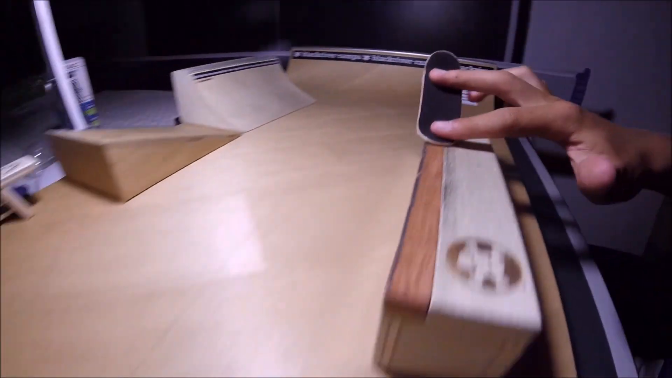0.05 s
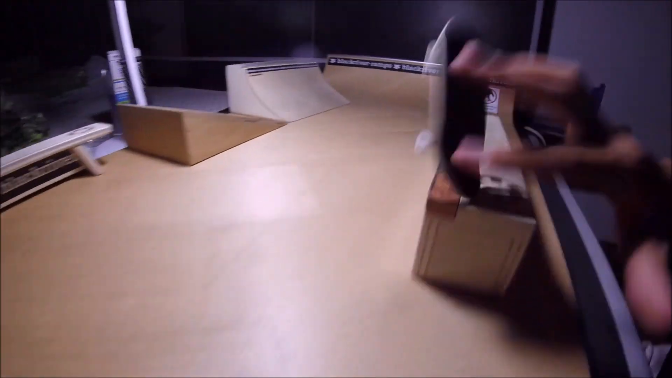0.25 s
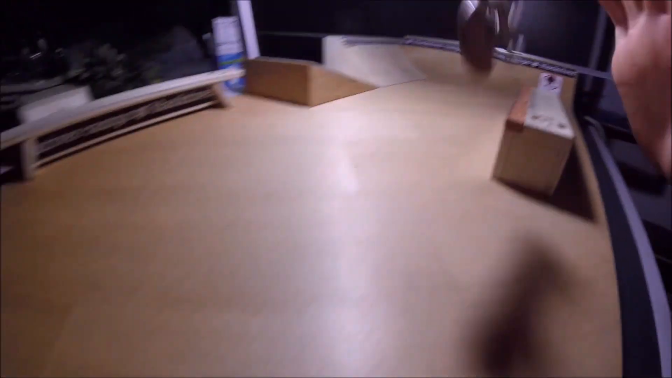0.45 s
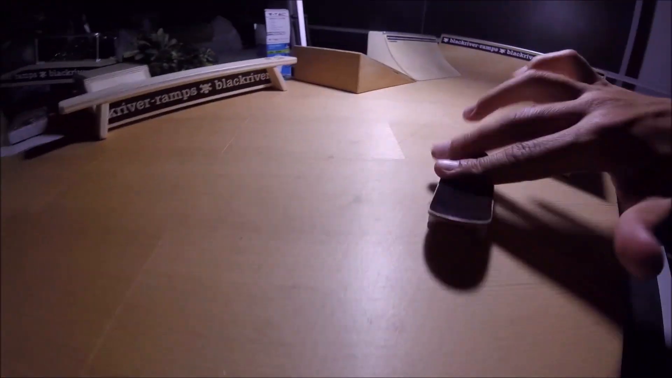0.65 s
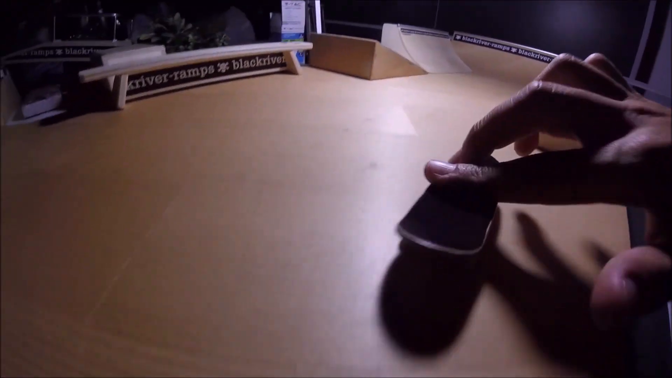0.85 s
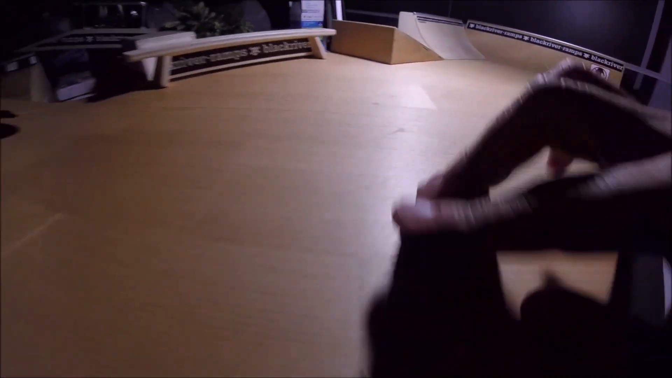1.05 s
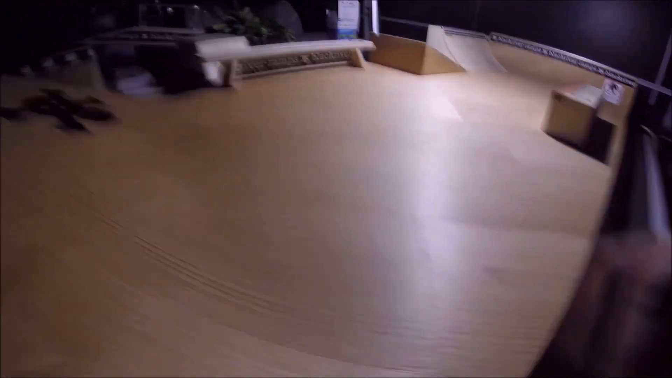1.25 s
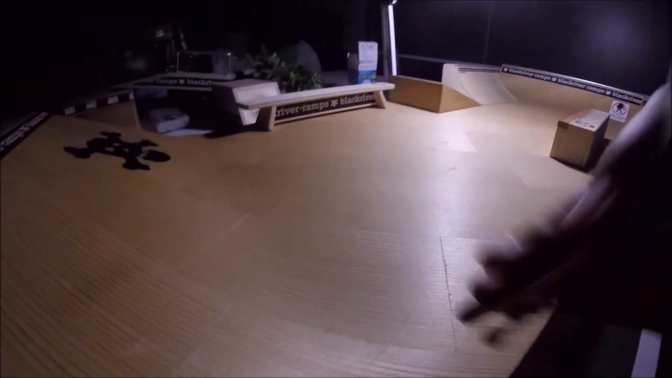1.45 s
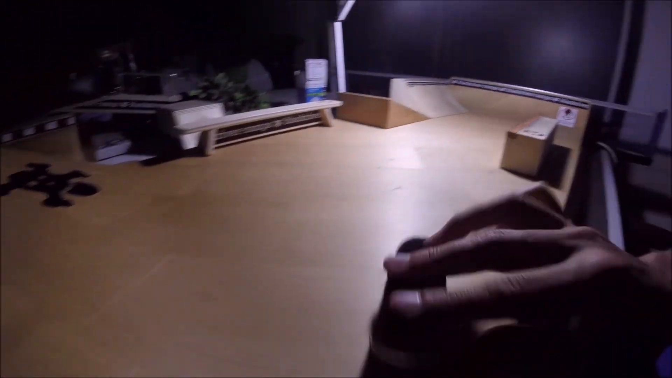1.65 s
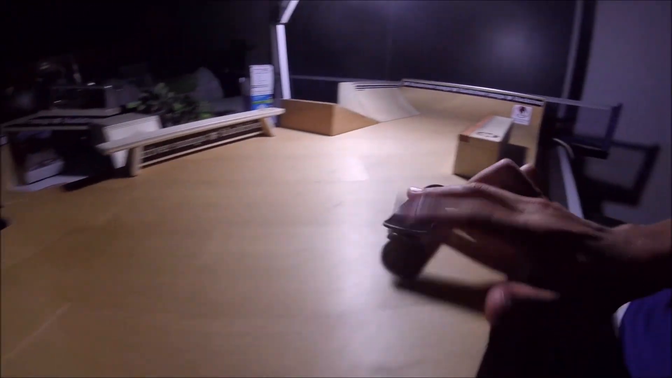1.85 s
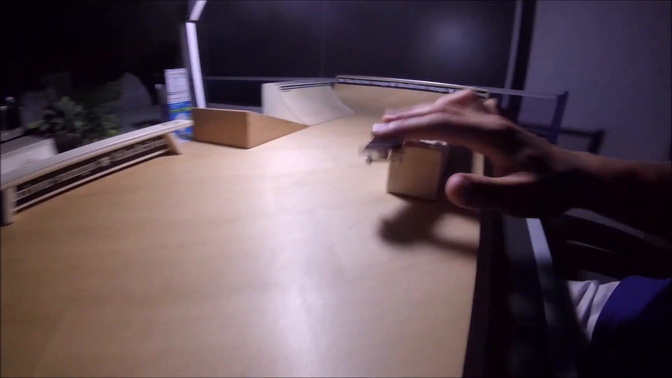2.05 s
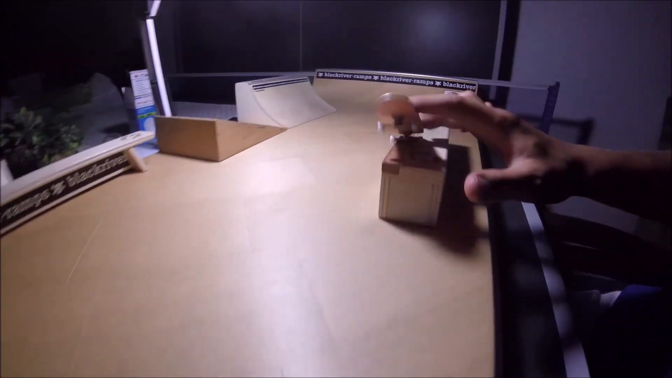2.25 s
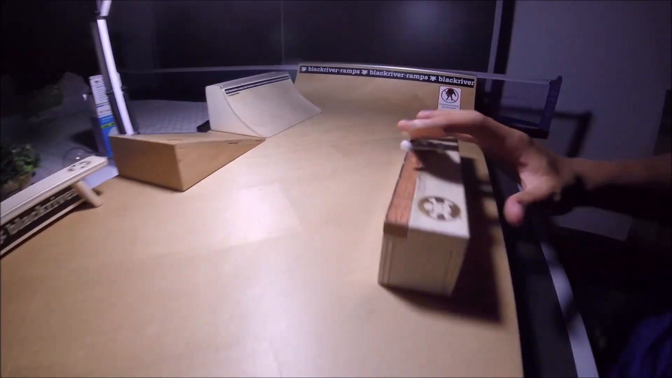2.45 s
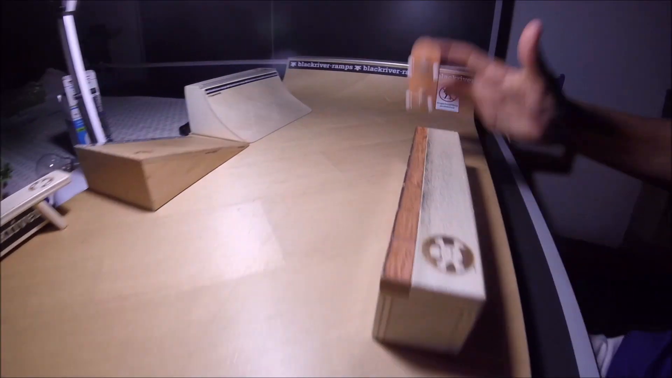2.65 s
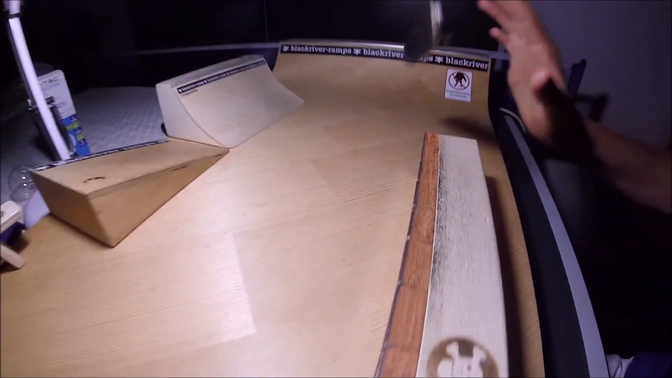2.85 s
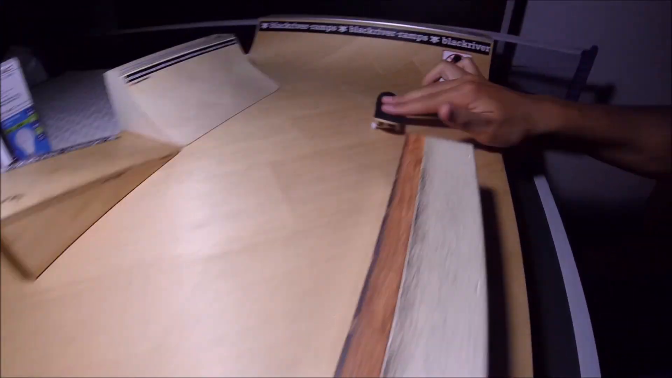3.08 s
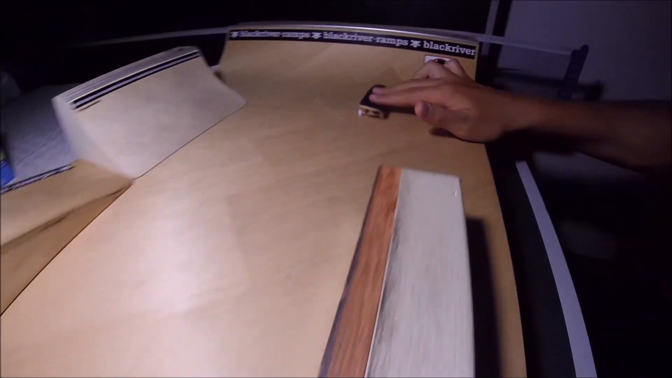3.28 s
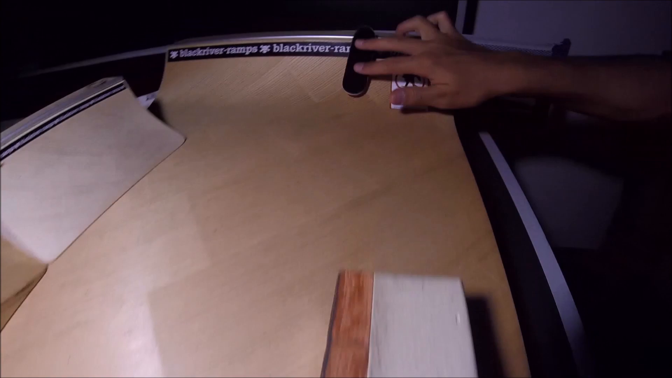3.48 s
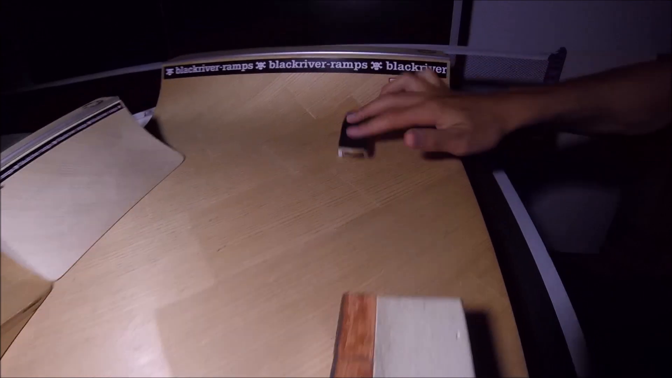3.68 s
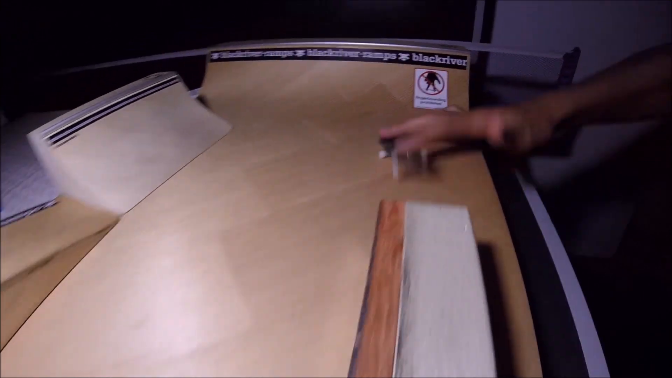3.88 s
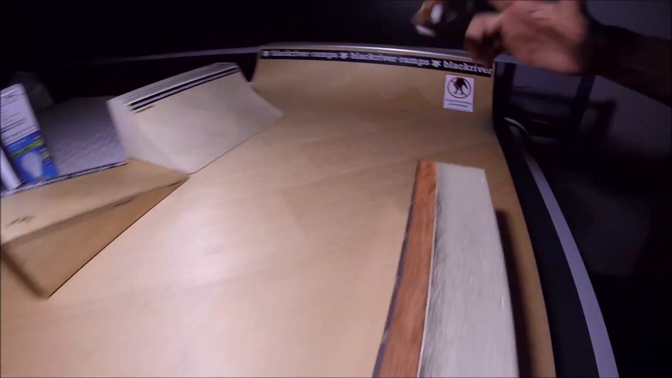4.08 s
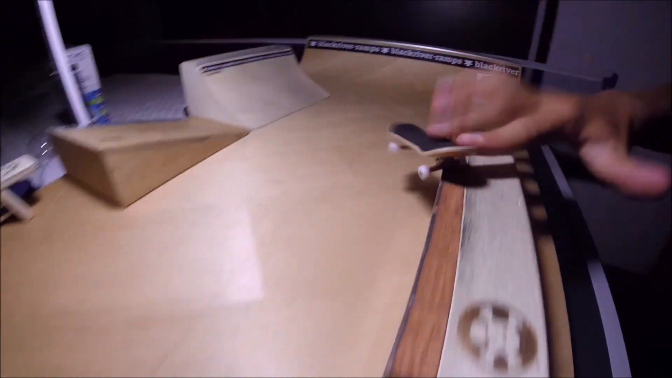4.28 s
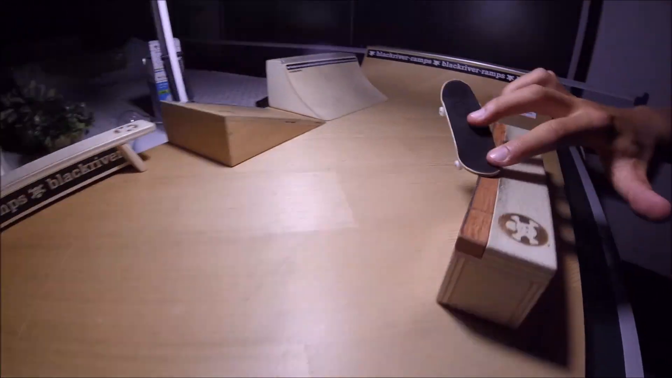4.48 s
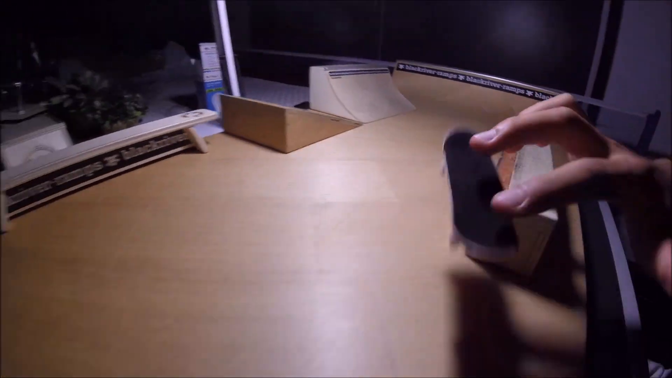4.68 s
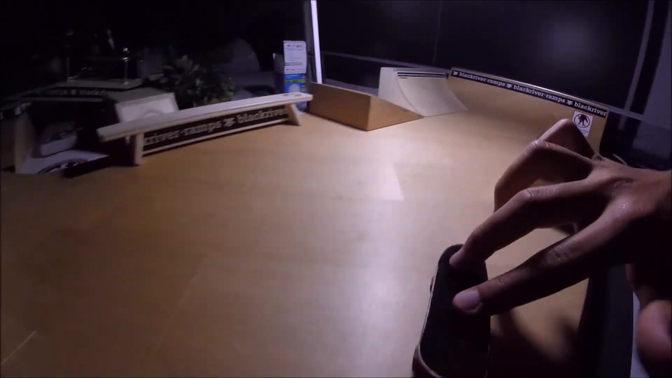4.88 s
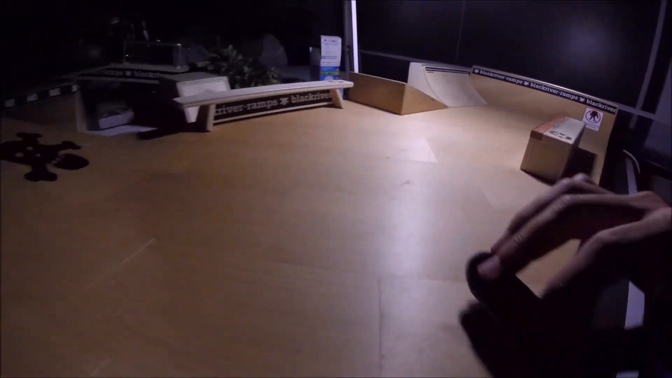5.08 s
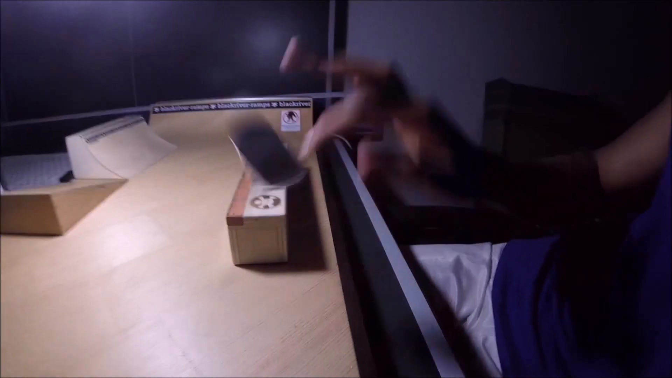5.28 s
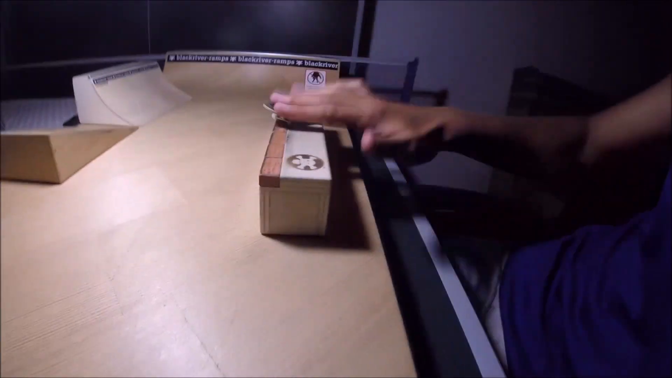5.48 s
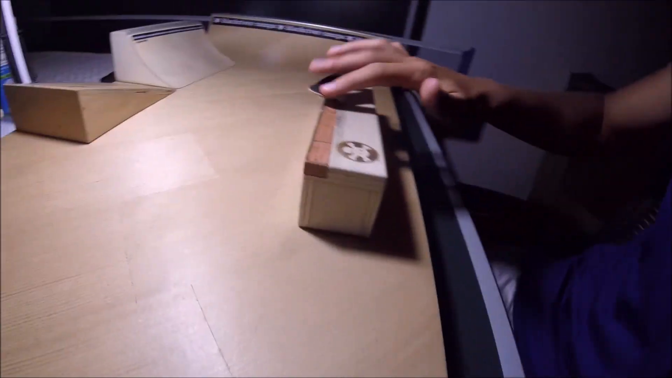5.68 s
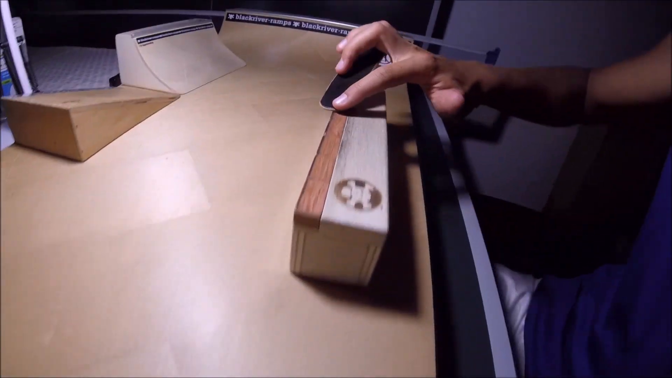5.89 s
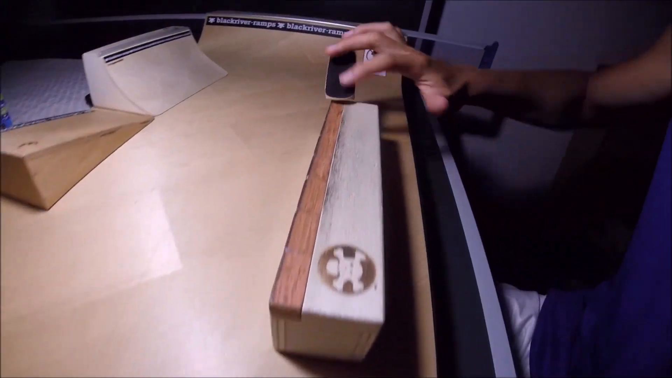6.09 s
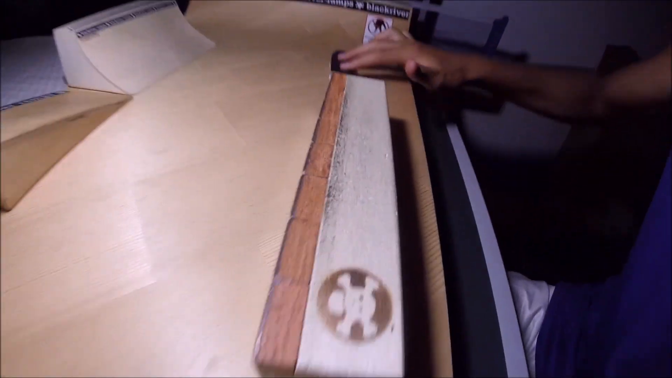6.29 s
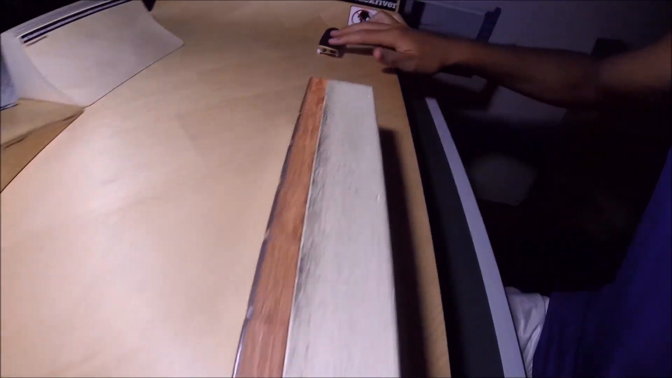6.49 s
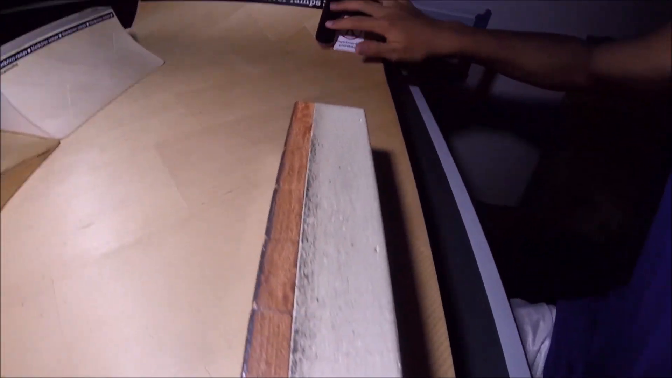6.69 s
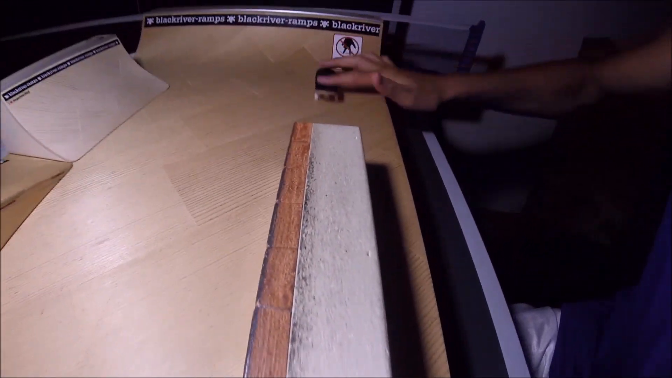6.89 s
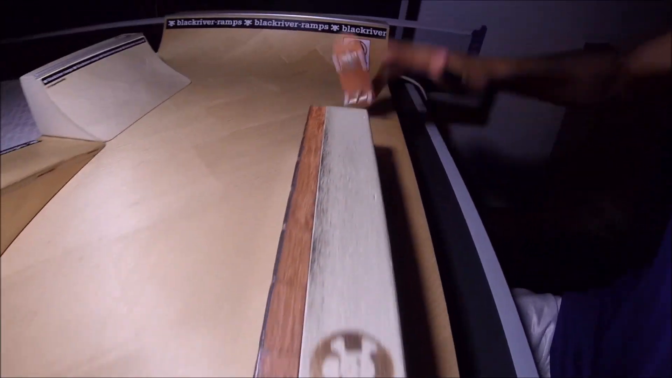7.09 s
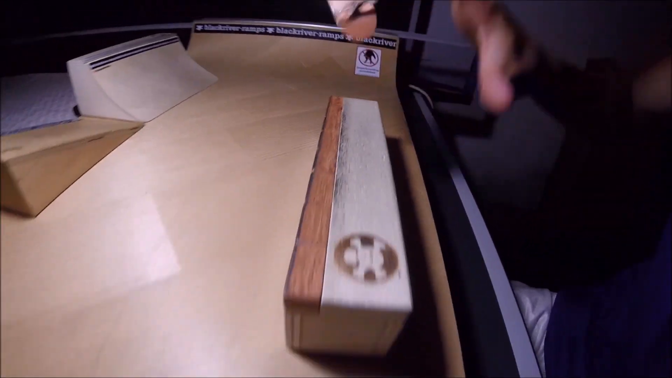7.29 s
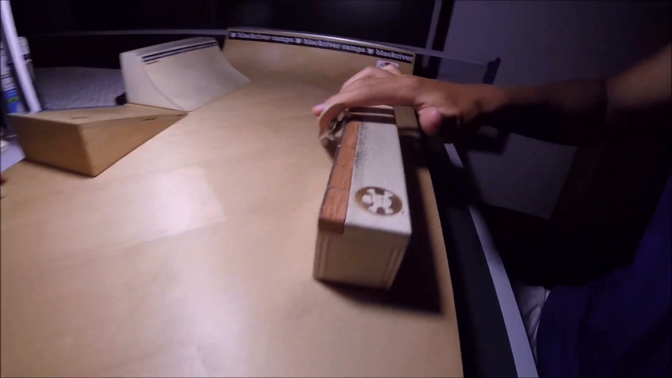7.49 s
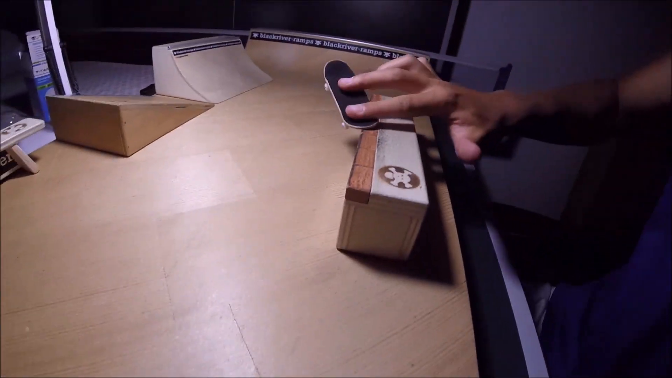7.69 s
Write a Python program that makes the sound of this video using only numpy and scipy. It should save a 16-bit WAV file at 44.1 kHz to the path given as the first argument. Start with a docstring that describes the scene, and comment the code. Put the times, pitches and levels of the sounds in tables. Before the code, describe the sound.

Very close, boxy pickup of a miniature skateboard on a wooden tabletop with ramps. Quick double and triple clacks mark pops and landings, with rattling truck chatter on the ledge and short fading wheel rubs between. A sharp plasticky knock hits the microphone's case early on, then more tricks follow, with quieter rolling gaps. Slight room reverberation, soft hiss and dull rumble stay underneath.

```python
"""A toy skateboard is rolled, popped, ground along a wooden ledge and landed on a desk, close to a small camera.
Strikes are bursts of noise and wheel rub is grainy noise, both through the cavities of the camera's case;
spinning bearings hiss in a narrow band, flat landings thump the desk top and the strikes echo in the room.
Knocks on the case ring its walls and mount as dying sines. Hiss and a slow rumble lie beneath.
The input saturates on peaks, and a gain control ducks what is loud and creeps back."""
import sys
import numpy as np
from scipy import signal
from scipy.fft import rfft, irfft
from scipy.io import wavfile
from scipy.ndimage import uniform_filter1d

SR = 44100
rng = np.random.default_rng(int(sys.argv[2]) if len(sys.argv) > 2 else 0)


def wrap_up_sound(samples):
    """Save the sound to the file named by the first command line argument, as 16-bit audio."""
    columns = np.atleast_2d(samples).T
    # keep every value between -1 and 1, then stretch to whole-number steps
    tamed = np.clip(columns, -1, 1)
    steps = np.round(tamed * 32767).astype(np.int16)
    wavfile.write(sys.argv[1], SR, steps)


N = 341334  # length in samples

# room tone and input noise, shape only: f/Hz, level/dB per Hz
HISS_COLOUR = [(24, -32.5), (40, -1.5), (345, -9), (516, -11), (1070, -16.5), (1850, -19), (3220, -24),
               (13800, -42.5), (16000, -65.5)]
HISS_DB = -56  # rms
# rumble of the jogged camera, shape only: f/Hz, level/dB
SWAY_COLOUR = [(6, -32.5), (18, -2.5), (35, -9.5), (70, -31.0), (200, -73.0)]
# the hand-held camera is jogged: t/s, level/dB
SWAYS = [(.0, -52), (.35, -44), (.75, -59), (1.0, -53), (1.418, -40), (2.4, -58), (3.1, -49), (4.85, -52),
         (5.37, -61.5), (6.27, -67.5), (6.95, -60)]
SWAY_S, SWAY_FLOOR_DB = 0.055, -59  # time from the peak of a swell to 1/e; steady rumble

# cavities of the case: f/Hz, width/Hz, level/dB
CASE_CAVITIES = [(989, 50, -4.5), (1320, 710, -4), (1501, 204, 6.5), (1865, 40, -3.5), (2375, 490, -1),
                 (2830, 36, -6), (3328, 530, -6.5), (3856, 310, -15.5), (5090, 600, -20.5),
                 (6244, 780, -12.5), (7580, 770, -20.5), (8720, 1000, -22.5)]
# what passes between the cavities: f/Hz, level/dB
CASE_PORT = [(500, -19), (800, -18.5), (1500, -18), (3500, -18), (4500, -24.5), (9000, -30), (12000, -41),
             (16000, -53.5)]
# modes of the desk top: f/Hz, width/Hz, level/dB
DESK_MODES = [(343, 87, -5), (465, 95, -8), (674, 120, 3)]
REGION_EDGES_HZ = (1300, 1950, 2900, 4500)  # between thud, deck, clack, snap and tick

# wheels and trucks in contact: full from t/s, rise/s, hold/s, snap level/dB, fade/dB per s,
# then against the snap: deck level/dB, clack level/dB
ROLL_RUNS = [(.0, .006, 0.0075, -45.5, 88, -4, -14), (0.286, 0.1, .015, -38.5, 352, 2, -2.5),
             (0.354, .02, .01, -53.5, 38.5, 2.5, -4), (0.625, 0.0055, 0.047, -45.5, 21.5, -5, -12),
             (1.09, 0.16, 0.094, -51, 65.5, -10, -9), (1.846, 0.19, .02, -45.5, 151, -16, 0.5),
             (1.968, 0.029, 0.11, -58, 151, -7, -9), (2.142, 0.0067, .02, -47.5, 46, -18, -6.5),
             (2.588, 0.064, 0.03, -37.5, 350.5, -9, -11), (2.67, .03, 0.033, -52, 45, -6.5, -18),
             (2.996, 0.0068, 0.062, -38, 38.5, -2, -10.5), (3.426, 0.18, 0.046, -60, 85, 6.5, 10.5),
             (3.631, 0.018, 0.063, -58, 60, 8.5, 9.5), (3.747, .03, .02, -59.5, 62, 3, 7),
             (3.843, 0.071, 0.022, -56.5, 150, -15, 7), (3.97, .006, .02, -62, 77, -3, -3),
             (4.3, .006, 0.012, -43, 198, 6.5, -5), (4.333, .02, .01, -52, 35, 4, -5),
             (4.639, 0.087, 0.014, -44.5, 127, -0.5, -5), (4.8, .006, .02, -45.5, 33, -11, -5.5),
             (5.16, 0.17, 0.017, -50, 250, -6, -0.5), (5.212, .02, 0.1, -65.5, 65, -5.5, -8),
             (5.523, 0.046, 0.011, -46, 79, 3, -5), (5.824, 0.19, 0.036, -57.5, 65, -8, -4),
             (6.06, 0.12, 0.017, -57, 130, 3, 4), (6.191, .006, 0.027, -43.5, 27.5, -2.5, -1),
             (6.787, 0.1, .03, -58, 70, -8, 11), (6.981, 0.095, .02, -52, 94.5, -1, 1),
             (7.11, .01, .01, -57, 63, -8, -7), (7.411, 0.0047, 0.0089, -49, 139.5, 2.5, -2),
             (7.588, 0.1, 0.016, -54.5, 115, -1.5, -8)]
RISE_DB = 20.5  # climb of a run over its rise time
ROLL_THUD_DB, ROLL_THUD_PER_CLACK, ROLL_TICK_DB = -2.5, 0.78, -12.5  # against the snap
# the wheels dig into the curve of a ramp: t/s, half length/s, gain level/dB
RAMP_PRESSES = [(3.64, .012, 0), (3.679, 0.017, 5.5), (3.747, 0.026, 2), (3.862, 0.034, 4),
                (6.758, .02, 3.5), (6.818, 0.0073, 1), (5.086, 0.031, 6.5)]
# the rolling falls silent for a while: start t/s, end t/s
ROLL_SILENT = 1.305, 1.69

# board strikes: t/s, snap energy level/dB, then against the snap: deck level/dB, clack level/dB,
# tick level/dB, desk boom level/dB; last contact length/ms
BOARD_STRIKES = [(0.0149, -18.5, -14, 0, -1, -7.5, 1.8), (0.198, -25, -20, -5, -17, -16, 1.8),
                 (0.208, -12, -33, -24, -10, -11, 2.2), (0.2238, -17, -15, -1, -19, -26, 1.6),
                 (0.2351, -8, -12, -7, -15, -17, 1.2), (0.238, -12.5, 10, -5, 1, -15, 0.55),
                 (0.28, -21, 8, 6, -6, -21, 1.5), (0.291, -15, -11, 8, -1, -25, 2.7),
                 (0.309, -14, -8, 9, 4, -28, 2.4), (0.3275, -18.5, -11, 4, 0.5, -15, 2.2),
                 (0.6261, -12, 6, -4, 1.5, -12, 2.3), (0.633, 0, -2.5, -5.5, -6.5, -28, 2.2),
                 (0.645, -4, -31, -12, -8, -22, 2.8), (0.652, 1.5, 1, -22, -5.5, -17, 2.3),
                 (0.6638, -13.5, 10, -12, -15, -13, 0.88), (1.083, -27, -3.5, 10, -7, -4, 3.8),
                 (1.097, -27.5, 4, 16, -2, -13, 3.9), (1.3033, -45, 4, 5, 19, -2, .8),
                 (1.638, -23, -24, -12, -5, -12.5, 1.1), (1.6675, -24, -16, -6.5, -2.5, -18.5, 2.3),
                 (1.6915, -13, -13, -3, -2, -13, 2.6), (1.9722, -19.5, -4, 9.5, 0, -10, 2.9),
                 (1.9845, -24.5, -10.5, 3, -4, -21, 1.34), (2.1468, -10, -5, -1.5, 0, -19, 4.4),
                 (2.201, -15, -10, -13, -6.5, -23, 2.5), (2.406, -29.5, -3.5, 7, 1, -14, 2.3),
                 (2.5313, -21.5, -22, -5, -5, -11.5, 2.3), (2.578, -16, -23.5, -10, 1, -15, 3.4),
                 (2.6018, -13, -16, -0.5, -6, -25, 3), (2.6164, -8, -3, -13.5, -9.5, -39, 4.2),
                 (2.9942, -5.5, -5, -18, -5, -12, 2.8), (2.9979, 6.5, -2, -9, -3.5, -28, 1.4),
                 (3.0017, 0.5, 0, -16, -0.5, -23, 1.1), (3.0063, 0.5, -2, -9, -7, -35, 3.8),
                 (3.6295, -34.5, 14, 17, -5, 3, 1.4), (3.966, -18.5, 4, 10, 3.5, -13, 1.7),
                 (3.975, -31, -6, 10, -8, -17, 1.6), (4.2945, -8, 0, 13, -5, -8, 2.1),
                 (4.3031, -28, 1, -0.5, 8, -15, 1.6), (4.3102, 0, -4, -6, -4, -13.5, 2.3),
                 (4.3202, -16.5, -17, 5, -3, -7, 2.5), (4.474, -25, -3, -8, -0.5, -4, 1.2),
                 (4.6043, -17.5, -16, -3, -7.5, -10, 2.5), (4.642, -18, -12, 0, 1.5, -25, 1),
                 (4.792, -19.5, 13, -7, 2, -22, 3.1), (4.7984, 3.5, -6.5, -12, -3.5, -18, 2.9),
                 (4.81, -11, 3, -9, -20, -15, 1.6), (5.1892, -14, -26, -1, 1, -16, 1.4),
                 (5.452, -21.5, 4.5, 1, -13, 2, 3.4), (5.4918, -11.5, -7, 2, -5, -3, 4.4),
                 (5.5054, -16.5, 7, 6, -2, 1, 1.4), (5.52, 2, -6.5, -13, -0.5, -20, 1.63),
                 (5.869, -26.5, 1, 0, -6, -24, 7.5), (5.977, -28, 8.5, 11.5, -8, -9, 1.2),
                 (6.0045, -28, 6, 1, -11, -21, 1.5), (6.0154, -28, 5, -1, -13.5, -14, 1.5),
                 (6.035, -17, -2, -20, -14, -32, 2.2), (6.0482, -20, -1, 5, -15, -21, 3),
                 (6.064, -16.5, -6, 5, -5, -28, 2.3), (6.148, -36, 11, -3, 1, -8, 1.9),
                 (6.191, -6.5, -6, 4, -14, -18, 1.3), (6.1927, -5.5, 7.5, -23, -3, -26, 1.44),
                 (6.1981, 1.5, 2, -24, -10.5, -21, 1.1), (6.207, -10, 2, 0, -14, -22, 0.47),
                 (7.0937, -17, -5, 6, 7, -23, 2.9), (7.4111, -18, -2, 9, 4, -34, 2.5),
                 (7.4172, -11, 2, -5, 0, -23, 1.2), (7.4235, -19, -5, 5, -1, -14, 1.7),
                 (7.463, -29.5, 11.5, 2, -2, -8, 1.6), (7.5543, -28.5, 2, 7, -20, -8, 4.2)]
# the thud follows deck and boom
THUD_DB, THUD_PER_DECK, THUD_PER_BOOM = -1.5, .3, .4
# flat landings push the desk top into one low mode, set by the spot: t/s, f/Hz, level/dB
LANDING_THUMPS = [(.238, 695, -34), (2.996, 327, -27), (6.193, 303, -44)]
THUMP_T60_S, THUMP_RISE_S = 0.082, 0.009
# trucks chatter along the ledge: start t/s, end t/s, snap energy level/dB,
# then against the snap: deck level/dB, clack level/dB
LEDGE_GRINDS = [(0.252, .325, -20, -1.5, 4), (2.61, 2.64, -18.5, 1, -2), (4.649, 4.695, -20.5, -24, 3),
                (6.055, 6.109, -29.5, 7.5, 2)]
CHATTER_GAP_S, CHATTER_JITTER, CHATTER_SPREAD_DB = .011, .35, 3.5  # jitter in gaps
CHATTER_TICK_DB, CHATTER_BOOM_DB, CHATTER_MS = -4.5, -22, 1.8

# the wheel bearings hiss when they spin fast: start t/s, end t/s, level/dB
BEARING_SPINS = [(1.078, 1.314, -62), (1.76, 1.91, -57), (3.627, 3.88, -69), (5.06, 5.18, -58),
                 (6.933, 7.05, -65.5)]
SPIN_FADE_S = 0.02

# knocks on the case: t/s, force level/dB, contact length/ms, roughness (limited to 0-1)
CASE_KNOCKS = [(1.3124, 9, 0.11, 0.17), (1.319, -0.5, 1, 1.17), (1.324, -5.5, 4., 0.8),
               (1.336, -9, 3., 0.75), (1.34, -0.5, 5.6, 0.8), (1.347, 3.5, 1.7, 0.7)]
# quickly damped modes of the case walls: f/Hz, level/dB, t60/s
CASE_WALLS = [(1026, -16, 0.012), (1200, -17.5, 0.0091), (1885, -2.5, 0.011), (2295, -9.5, 0.018),
              (2583, -8, 0.017), (4090, -19.5, 0.021), (7300, -22, 0.0042)]
# modes of the mount, which the blows set ringing: f/Hz, level/dB, t60/s
MOUNT_MODES = [(626, -38, .22), (686, -44, .4), (868, -33, .16), (925, -36, .1), (1878, -33, .56)]

EDGE_HZ = 15500  # upper band limit of the output


def gain_of(db):
    """Decibels to a factor."""
    return 10 ** (np.asarray(db) / 20)


def evened(x):
    """Scales to rms 1."""
    return x / np.sqrt(np.mean(x ** 2) + 1e-20)


def read(points, hz):
    """Reads a spectrum on a log-frequency axis."""
    f, value = np.transpose(points)
    return np.interp(np.log(hz + 1), np.log(f + 1), value)


def add(mix, s, sound):
    """Mixes a sound in at a time."""
    part = mix[..., round(s * SR):][..., :sound.shape[-1]]
    part += sound[..., :part.shape[-1]]


def modes(table, hz):
    """Power of a set of resonances."""
    return sum(gain_of(db) ** 2 / (1 + (2 * (hz - f) / w) ** 2) ** 2 for f, w, db in table)


def ring(table):
    """Dying sines, one second long."""
    t = np.arange(SR) / SR
    return sum(gain_of(db - 60 * t / t60) * np.sin(2 * np.pi * hz * t) for hz, db, t60 in table)


def causal(gain):
    """Minimum-phase impulse response of energy 1 for a gain given from 0 Hz to SR / 2."""
    log_gain = np.log(np.maximum(gain / gain.max(), 1e-4))
    circle = np.concatenate([log_gain, log_gain[-2:0:-1]])
    taps = np.fft.ifft(np.exp(np.conj(signal.hilbert(circle)))).real[:2048]
    return taps / np.linalg.norm(taps)


def burst(ms, noise):
    """A contact force of energy 1: quick rise, exponential fall."""
    u = np.arange(noise.shape[-1]) / (SR * max(ms, .03) / 1000)
    force = (1 - np.exp(-3.5 * u)) * np.exp(-u) * noise
    return force / np.linalg.norm(force, axis=-1, keepdims=True)


def shaped_noise(points):
    """Noise of rms 1 with a given spectrum."""
    hz = np.fft.rfftfreq(N, 1 / SR)
    return evened(irfft(rfft(rng.standard_normal(N)) * gain_of(read(points, hz)), N))


def room_tone():
    """Steady hiss, and a slow rumble that swells when the camera is jogged."""
    t = np.arange(N) / SR
    swells = sum(gain_of(db) * np.exp(-((t - s) / SWAY_S) ** 2) for s, db in SWAYS)
    rumble = (gain_of(SWAY_FLOOR_DB) + swells) * shaped_noise(SWAY_COLOUR)
    return gain_of(HISS_DB) * shaped_noise(HISS_COLOUR) + rumble


def case_bands():
    """The colour of the case, cut into thud, deck, clack, snap and tick regions; last the boom of the desk."""
    hz = np.fft.rfftfreq(8192, 1 / SR)
    case_power = gain_of(read(CASE_PORT, hz)) ** 2 + modes(CASE_CAVITIES, hz)
    lowpasses = [1 / (1 + (hz / edge) ** 12) for edge in REGION_EDGES_HZ]
    # neighbouring low-passes differ by one region
    regions = abs(np.diff([0 * hz] + lowpasses + [1 + 0 * hz], axis=0))
    powers = [*(case_power * regions), modes(DESK_MODES, hz)]
    return [causal(np.sqrt(power)) for power in powers]


def wheel_rub(grains_per_s=1200, spread_db=1.0, smooth=1.9, flutter_db=1.0):
    """Wheels on the grain of the wood: dense uneven ticks on a steady rub, as six noises under one envelope."""
    grains = rng.random(N) < grains_per_s / SR
    ticks = gain_of(spread_db * np.minimum(rng.exponential(1, N), 4)) * grains
    # loose trucks make the contact flutter
    slow = uniform_filter1d(uniform_filter1d(rng.standard_normal(N), 300), 300)
    flutter = gain_of(flutter_db * evened(slow))
    return evened((smooth + evened(ticks)) * flutter * rng.standard_normal((6, N)))


def contact(t):
    """Level of the five regions: every run rises, holds and fades, and the runs add in power."""
    power = np.zeros((5, len(t)))
    for s, rise, hold, db, fade_db, deck_db, clack_db in ROLL_RUNS:
        rising_db = RISE_DB * np.maximum(s - t, 0) / max(rise, .002)
        fading_db = fade_db * np.maximum(t - s - hold, 0)
        thud_db = ROLL_THUD_DB + ROLL_THUD_PER_CLACK * clack_db
        region_db = np.array([[thud_db], [deck_db], [clack_db], [0], [ROLL_TICK_DB]])
        power += gain_of(region_db + db - rising_db - fading_db) ** 2
    return np.sqrt(power)


def wandering(x, patchy_db=2.0):
    """The colour drifts in patches as board and hand move."""
    z = signal.stft(x, nperseg=1024, noverlap=768)[2]
    patches = rng.standard_normal(z.T.shape)  # time by frequency
    patches = evened(uniform_filter1d(uniform_filter1d(patches, size=9, axis=0), size=4, axis=1))
    return signal.istft(z * gain_of(patchy_db * patches.T), nperseg=1024, noverlap=768)[1][:N]


def rolling(rub, bands):
    """The rub drives each region of the case colour, louder as wheels press, silent for a short stretch around
    the knocks."""
    t = np.arange(N) / SR
    coarse = t[::32]
    rolled = np.zeros(N)
    for level, noise, band in zip(contact(coarse), rub, bands):
        coloured = signal.oaconvolve(noise, band)[:N]
        rolled += np.interp(t, coarse, level) * wandering(coloured)
    press_db = sum(db * np.exp(-((t - at) / half) ** 2) for at, half, db in RAMP_PRESSES)
    touching = np.clip(np.maximum(ROLL_SILENT[0] - t, t - ROLL_SILENT[1]) / 0.006, 0, 1)
    return touching * gain_of(press_db) * rolled


def clacks(bands):
    """Every strike is a short contact force that drives the regions by its own amounts."""
    strikes = BOARD_STRIKES + chatter()
    out, noise = np.zeros(N), rng.standard_normal((len(strikes), 6, 1200))
    for (s, db, deck_db, clack_db, tick_db, boom_db, ms), grit in zip(strikes, noise):
        thud_db = THUD_DB + THUD_PER_DECK * deck_db + THUD_PER_BOOM * boom_db
        levels = gain_of(db + np.array([thud_db, deck_db, clack_db, 0, tick_db, boom_db]))
        rung = signal.fftconvolve(burst(ms, grit), np.array(bands), axes=1)
        # the force starts slightly ahead of the listed time
        add(out, s - .0006, levels / np.linalg.norm(rung, axis=1) @ rung)
    return out


def room(x, t60=0.67, dulling=0.033):
    """Sparse echoes of random sign from desk, ramps and walls, dying away and slightly dulled."""
    taps = np.zeros(SR)
    at = np.arange(150, len(taps) - 20, 20)
    taps[at + rng.integers(0, 20, len(at))] = rng.choice([-1., 1.], len(at))
    taps *= gain_of(-60 * np.arange(len(taps)) / SR / t60)
    taps = signal.lfilter([1], [1, -np.clip(dulling, 0, .9)], taps)
    return signal.oaconvolve(x, taps / np.linalg.norm(taps))[:N]


def landing_thumps():
    """Each flat landing rings one low desk mode with a soft onset."""
    out = np.zeros(N)
    for s, hz, db in LANDING_THUMPS:
        thump = ring([(hz, db, THUMP_T60_S)])[:SR // 5]
        onset = np.minimum(np.arange(len(thump)) / SR / THUMP_RISE_S, 1)
        add(out, s, thump * onset)
    return out


def chatter():
    """Uneven rows of small strikes fill every grind, at most twelve to a row."""
    rows = []
    for start, end, db, deck_db, clack_db in LEDGE_GRINDS:
        late, loud, deck, clack = rng.standard_normal((12, 4)).T
        times = start + CHATTER_GAP_S * (np.arange(len(late)) + CHATTER_JITTER * late)
        spread = CHATTER_SPREAD_DB * np.array([loud, deck, clack])
        rows += [(s, db + a, deck_db + b, clack_db + c, CHATTER_TICK_DB, CHATTER_BOOM_DB, CHATTER_MS)
                 for s, a, b, c in zip(times, *spread) if s < end]
    return rows


def bearings(rub, hiss_hz=8750., q=12.):
    """Fast wheels hiss: rub noise through two equal narrow resonances, faded in and out."""
    t = np.arange(N) / SR
    resonance = signal.iirpeak(hiss_hz, q, SR)
    hiss = evened(signal.lfilter(*resonance, signal.lfilter(*resonance, rub)))
    spin = sum(gain_of(db) * np.clip(np.minimum(t - start, end - t) / SPIN_FADE_S, 0, 1)
               for start, end, db in BEARING_SPINS)
    return spin * hiss


def knocks(scrape_hz=4400.0, stiff_hz=905.0, dull_hz=6760.0):
    """Blows and a short scrape on the case ring its walls and mount straight into the microphone."""
    blow, scrape = np.zeros(N), np.zeros(N)
    noise = rng.standard_normal((len(CASE_KNOCKS), 1200))
    for (s, db, ms, rough), grit in zip(CASE_KNOCKS, noise):
        rough = np.clip(rough, 0, 1)
        add(blow, s, gain_of(db) * (1 - rough) * burst(ms, np.ones(1200)))
        add(scrape, s, gain_of(db) * rough * burst(ms, grit))
    scrape = signal.lfilter(*signal.butter(2, scrape_hz, fs=SR), scrape)
    blow = signal.lfilter(*signal.butter(2, dull_hz, fs=SR), blow)
    # stiff walls pass little bass
    walls = signal.lfilter(*signal.butter(3, stiff_hz, "high", fs=SR), ring(CASE_WALLS)[:4000])
    wall_sound = signal.oaconvolve(blow + scrape, walls)[:N]
    mount_sound = signal.oaconvolve(blow + 0.32 * scrape, ring(MOUNT_MODES))[:N]
    return wall_sound + mount_sound


def scene():
    """Board, room and case together; only strikes and thumps excite the room."""
    bands, rub = case_bands(), wheel_rub()
    strikes = clacks(bands) + landing_thumps()
    echoes = gain_of(-12.0) * room(strikes)
    board = strikes + echoes + rolling(rub[:5], bands) + bearings(rub[5])
    return (board + knocks() + room_tone())[None]


def record(dry, knee_db=-14.0, slope=0.77, recovery_db=19.5, lag=1400):
    """Gain control falls within tens of ms above the knee and creeps back; the input saturates; band limit."""
    level_db = 10 * np.log10(abs(uniform_filter1d(dry[0] ** 2, 128)) + 1e-12)
    # peak hold that sinks by recovery_db per second
    fall = np.arange(N) * recovery_db / SR
    held_db = np.maximum.accumulate(level_db + fall) - fall
    over_db = np.maximum(held_db - knee_db, 0)
    r = np.exp(-1 / lag)  # lag in samples
    duck_db = np.clip(slope, 0, 1) * signal.lfilter([1 - r], [1, -r], over_db)
    saturated = 1.1 * np.tanh(dry / gain_of(duck_db) / 1.181)
    band_limit = signal.firwin(255, EDGE_HZ, window=("kaiser", 9), fs=SR)
    return signal.oaconvolve(saturated, band_limit[None], "same")


dry = scene()
out = record(dry)
wrap_up_sound(out)
```